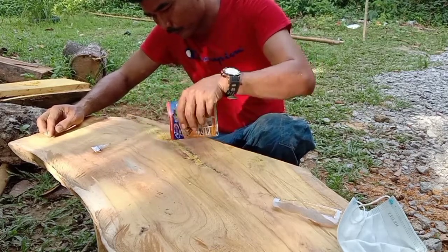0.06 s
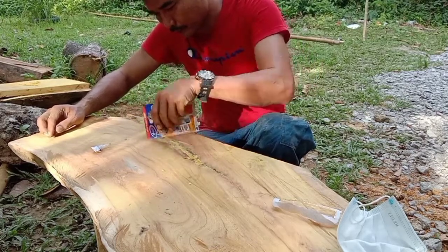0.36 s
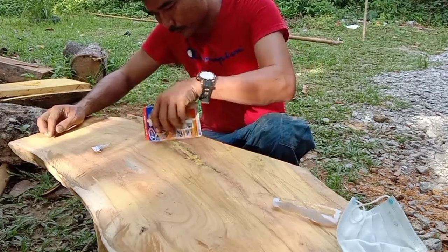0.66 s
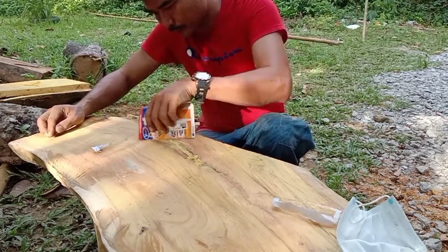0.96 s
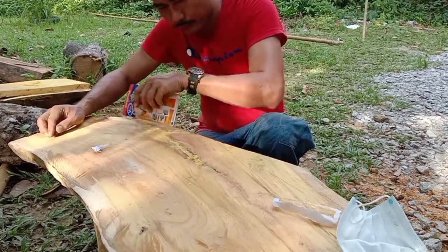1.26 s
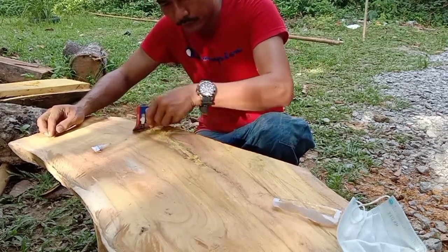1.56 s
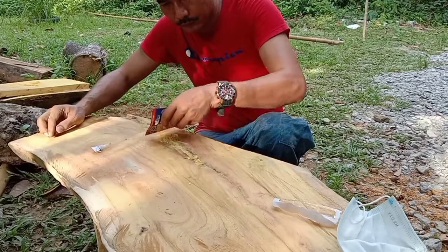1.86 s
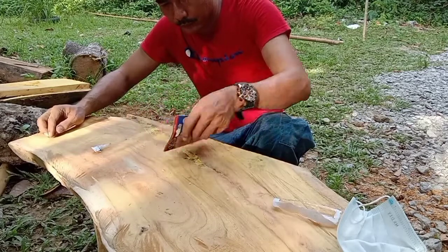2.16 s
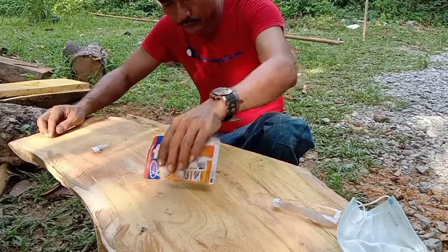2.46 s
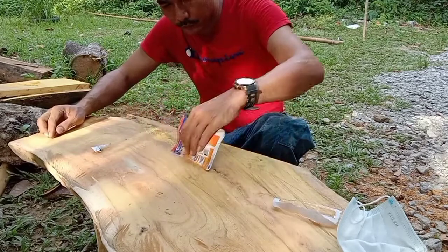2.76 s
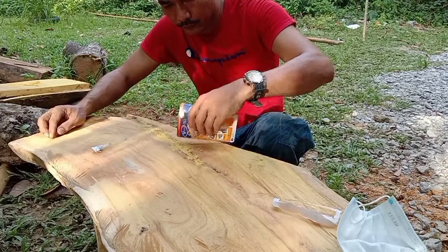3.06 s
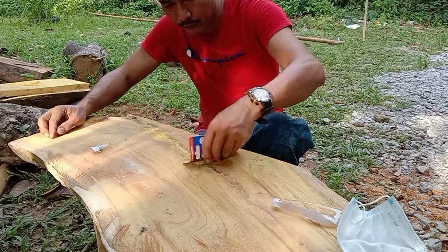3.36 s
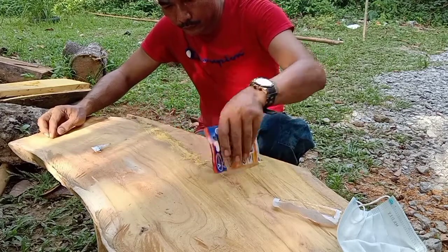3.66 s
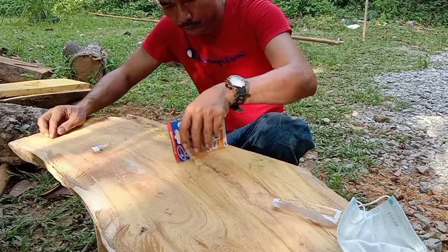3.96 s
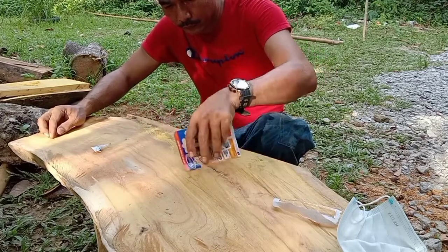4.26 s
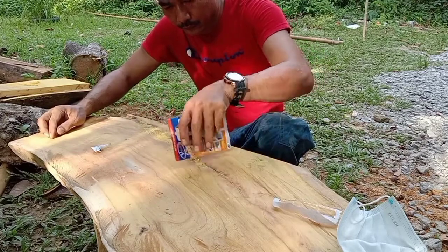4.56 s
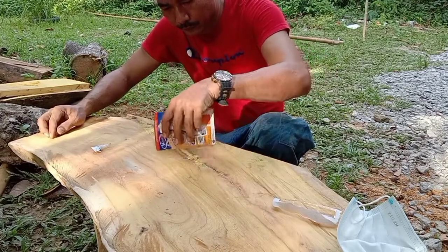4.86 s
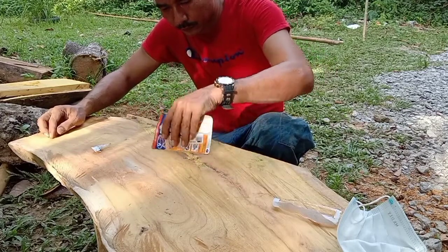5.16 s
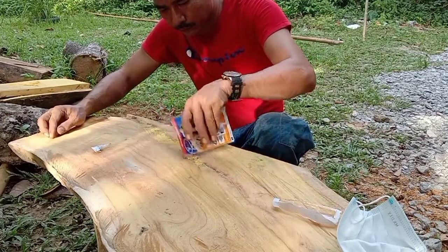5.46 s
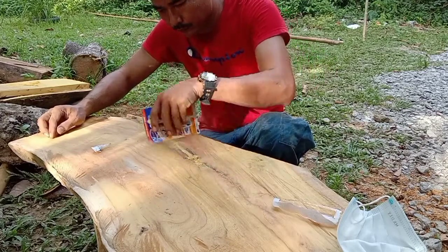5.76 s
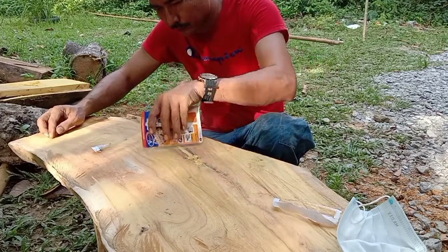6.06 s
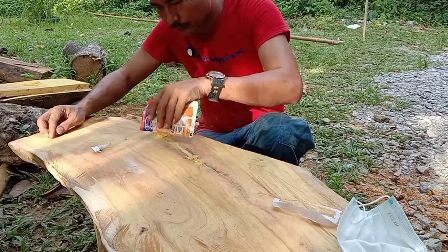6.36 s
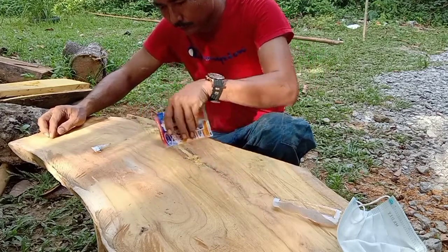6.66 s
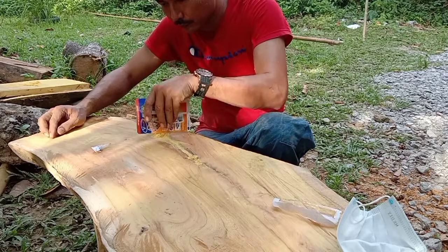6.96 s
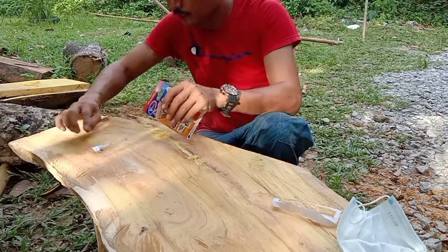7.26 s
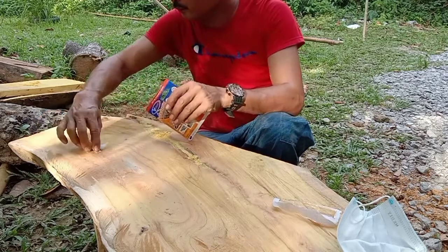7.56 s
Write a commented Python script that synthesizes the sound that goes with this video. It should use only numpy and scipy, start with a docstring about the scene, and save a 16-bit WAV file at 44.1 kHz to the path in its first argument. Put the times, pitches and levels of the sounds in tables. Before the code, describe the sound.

A stiff card scrapes a wooden slab in short strokes, light and then harder, while cicadas buzz faintly outdoors.

```python
"""Outdoors, cicadas buzz their tymbals, other insects twitter in quick falling notes, and a few
calls come from far away. A stiff card starts to scrape a wooden slab in short strokes, light at first,
then harder. Its edge catches and slips on the grain: the card rasps and bends, the edge hisses and
snaps off ridges, and under pressure the slab rumbles. Last, a finger gives the wood one brief rub."""
import sys
import numpy as np
from scipy import signal
from scipy.fft import rfft, irfft, next_fast_len
from scipy.io import wavfile
from scipy.ndimage import uniform_filter1d, map_coordinates

SR = 44100
rng = np.random.default_rng(int(sys.argv[2]) if len(sys.argv) > 2 else 0)


def unload_wav(signal):
    """Save mono or channel-first audio to the path in sys.argv[1] as 16-bit WAV at rate SR, clipped to [-1, 1]."""
    wavfile.write(
        sys.argv[1],
        SR,
        np.round(np.clip(np.atleast_2d(signal).T, -1, 1) * 32767).astype(np.int16),
    )


N = 344862


def amp(db):
    """Decibels to gain."""
    return 10 ** (np.asarray(db) / 20)


def unit(x):
    """Scale to rms 1."""
    return x / np.sqrt(np.mean(x ** 2) + 1e-20)


def wobble(rate, size):
    """A smooth random curve, rate knots a second."""
    knots = rng.standard_normal(int(size * rate / SR) + 4)
    return map_coordinates(knots, [np.arange(size) * rate / SR])


def add(track, start_s, x):
    """Mix x into the track at start_s."""
    i = max(round(start_s * SR), 0)
    track[i:i + len(x)] += x[:len(track) - i]


def gate_db(t, hold_s, attack_db_per_s, release_db_per_s):
    """0 dB from time 0 to hold_s, with a steady rise before and a steady fall after."""
    return attack_db_per_s * np.minimum(t, 0) - release_db_per_s * np.maximum(t - hold_s, 0)


def response(curve, size=4096):
    """Minimum-phase impulse response of an EQ curve; energy 1."""
    hz, db = np.transpose(curve)
    bins_hz = np.fft.rfftfreq(size, 1 / SR)
    gain = amp(np.interp(np.log(bins_hz + 1), np.log(hz), db))
    cepstrum = irfft(np.log(gain))
    cepstrum[1:size // 2] *= 2
    cepstrum[size // 2 + 1:] = 0
    impulse = irfft(np.exp(rfft(cepstrum)))[:size // 2]
    return impulse / np.linalg.norm(impulse)


def ringing(body, t60, ring_db):
    """Give an impulse response a tail of dense random modes; energy 1."""
    t = np.arange(int(t60 * SR) + 2) / SR
    tail = rng.standard_normal(len(t)) * amp(-60 * t / t60)
    tail *= amp(ring_db) / np.linalg.norm(tail)
    tail[0] = 1
    impulse = signal.fftconvolve(body, tail)
    return impulse / np.linalg.norm(impulse)


def noise(curve):
    """Steady noise coloured by an EQ curve; rms 1."""
    colour = response(curve)
    return unit(signal.fftconvolve(rng.standard_normal(N + len(colour) - 1), colour, "valid"))


def fuzzy_tone(hz, width_hz, size=N):
    """A narrow band of noise around a steady or gliding pitch; rms 1."""
    drift = wobble(width_hz, size) + 1j * wobble(width_hz, size)
    phase = 2 * np.pi * np.cumsum(hz + np.zeros(size)) / SR
    return unit(np.real(drift * np.exp(1j * phase)))


# Tone of the outdoor bed: freq_hz, gain_db
AIR_EQ = [(20, -21), (45, -11), (90, 1.5), (140, 2.5), (300, -6), (600, -8), (900, -6.5), (1450, -7.5),
          (2000, -16), (3300, -15), (6000, -19), (10000, -33.5)]

def air():
    """Still air and far rustle: a low bed that barely wavers."""
    return amp(-66.5 + 0.4 * wobble(3.1, N)) * noise(AIR_EQ)


# Faint calls in the distance: start_s, length_s, start_hz, end_hz, level_db, blur_hz
CALL_CUES = [(0, 0.044, 404, 418, -58, 11), (0.036, 0.063, 427, 440, -62.5, 9.6),
             (0, 0.17, 1706, 1570, -60.5, 500), (0.133, 0.13, 1490, 1240, -58, 230),
             (0.636, 0.09, 1540, 1690, -62, 260), (1.175, 0.11, 1240, 1296, -65.5, 100),
             (1.416, 0.067, 1263, 1187, -58, 52), (1.451, 0.12, 1590, 1660, -64.5, 100)]

def far_calls():
    """Short gliding calls, blurred by distance."""
    out = np.zeros(N)
    for start_s, length_s, start_hz, end_hz, level_db, blur_hz in CALL_CUES:
        size = int(length_s * SR)
        call = fuzzy_tone(np.linspace(start_hz, end_hz, size), blur_hz, size)
        add(out, start_s, amp(level_db) * call * signal.windows.tukey(size, .5))
    return out


# Tone of the cicada chorus: freq_hz, gain_db
CICADA_EQ = [(5600, -40.5), (6400, -14.5), (6900, -4), (7350, -3), (7650, -2), (8000, -3), (8400, -9),
             (9200, -27), (10300, -26), (11000, -19.5), (11500, -33), (12500, -21), (14000, -22),
             (15400, -17)]

def cicadas():
    """A chorus of buzzing tymbals, with two nearer voices standing out as pitched bands."""
    chorus = noise(CICADA_EQ) * amp(-62 + wobble(300, N))
    low_voice = amp(-71 + 3.7 * wobble(2.1, N)) * fuzzy_tone(7330, width_hz=250)
    high_voice = amp(-80 + 1.5 * wobble(3.2, N)) * fuzzy_tone(7980, width_hz=150)
    return (chorus + low_voice + high_voice) * amp(0.4 * wobble(1.9, N))


# Guide curves for the twitter: start_s, length_s, guide_db, first_guide_hz, last_guide_hz
TWITTER_PHRASES = [(0.352, 0.5, -60, 5180, 5500), (1.186, 1.07, -60, 6020, 5980),
                   (2.334, 0.093, -59.5, 5380, 5230), (3.5, 0.4, -57, 5430, 5430),
                   (4.22, 0.28, -60.5, 5540, 5160), (5.401, .2, -64, 5070, 5120),
                   (5.896, .25, -58, 5430, 5420), (6.418, .68, -54, 5790, 5460),
                   (7.25, 0.233, -71, 4880, 4830), (7.72, .1, -58.5, 5630, 5730)]

def phrasing(t, idle_db=-77.5, idle_hz=4750.0, fade_s=.1):
    """Guide level and pitch for the notes: each phrase lifts both above a soft, low idle."""
    effort, guide_db, guide_hz = np.zeros(len(t)), np.full(len(t), idle_db), np.full(len(t), idle_hz)
    for start_s, length_s, db, first_hz, last_hz in TWITTER_PHRASES:
        lift = np.clip(1 + np.minimum(t - start_s, start_s + length_s - t) / fade_s, 0, 1)
        hz = np.interp(t, [start_s, start_s + length_s], [first_hz, last_hz])
        guide_db = np.where(lift > effort, idle_db + lift * (db - idle_db), guide_db)
        guide_hz = np.where(lift > effort, idle_hz + lift * (hz - idle_hz), guide_hz)
        effort = np.maximum(effort, lift)
    return guide_db, guide_hz


def insect_twitter(notes_per_s=110, note_s=0.029, floor_hz=4520, fall_share=.75):
    """Quick falling notes and their echoes from the trees merge into a twitter over a thin whine."""
    out, t = np.zeros(N), np.arange(int(note_s * SR)) / SR
    last_s = N / SR - note_s
    times = np.arange(0, last_s, 1 / notes_per_s)
    envelope = np.sqrt(np.abs(np.sin(np.pi * t / note_s)))
    scatter = rng.standard_normal((len(times), 3))
    for start_s, guide_db, guide_hz, (late, loud, sharp) in zip(times, *phrasing(times), scatter):
        top_hz = guide_hz + 200 + 50 * sharp
        pitch_hz = top_hz - fall_share * (top_hz - floor_hz) * t / note_s
        note = np.sin(2 * np.pi * np.cumsum(pitch_hz) / SR) * envelope
        echoed = signal.fftconvolve(note, ringing(np.ones(1), t60=.1, ring_db=6))
        add(out, min(start_s + 0.0085 * late, last_s), amp(guide_db - 5 + 3 * loud) * echoed)
    whine_db = -70.5 + 2.2 * wobble(3, N)
    whine_hz = 4640 + 70 * wobble(3.3, N) + 90 * wobble(200, N)
    return out + amp(whine_db) * fuzzy_tone(whine_hz, width_hz=420)


def slips(size, per_s, spread_db):
    """Stick-slip crackle: tiny releases at random moments, a few much larger than the rest."""
    strength = amp(spread_db * np.minimum(rng.exponential(size=size), 3))
    fires = rng.random(size) < per_s / SR
    return unit(fires * strength * rng.choice([-1, 1], size))


def scuff(body, rise_s=.0018):
    """A soft contact: a tiny swell of friction rings the body; peak 1."""
    t = np.arange(SR // 50) / SR
    friction = rng.standard_normal(len(t)) * t * np.exp(-t / rise_s)
    contact = signal.fftconvolve(friction, body)
    return contact / np.abs(contact).max()


# The few high resonances that a light touch wakes: freq_hz, gain_db
TOUCH_EQ = [(600, -38), (1050, -43.5), (1270, 2.5), (1500, -13.5), (2300, -13), (3200, 0), (3600, -2),
            (3900, 2.5), (4250, -2), (4650, 3.5), (5300, -15), (7500, -8), (10500, -25.5), (14500, -14.5)]
# Light ticks on the wood: start_s, dry_peak_db
TICK_CUES = [(1.316, -43), (1.425, -37), (1.809, -35.5), (3.074, -44), (7.581, -26)]

def ticks():
    """Light contacts ring the wood, thin and bright."""
    out, touch = np.zeros(N), response(TOUCH_EQ)
    for start_s, peak_db in TICK_CUES:
        add(out, start_s, amp(peak_db) * scuff(ringing(touch, t60=0.17, ring_db=-1)))
    return out


def finger_rub(start_s=7.56, hold_s=0.094, lead_s=.07):
    """A fingertip slips over the grain and excites the same high resonances as the ticks."""
    out, t = np.zeros(N), np.arange(SR // 4) / SR - lead_s
    grain = unit(slips(len(t), per_s=3800, spread_db=5) + amp(-12) * rng.standard_normal(len(t)))
    level_db = -48 + gate_db(t, hold_s, attack_db_per_s=830, release_db_per_s=529)
    add(out, start_s - lead_s, signal.fftconvolve(grain * amp(level_db), response(TOUCH_EQ)))
    return out


# Narrow modes of the slab: pitch_hz
WOOD_MODES = [302, 1071, 1165, 1475, 1678, 1774, 2040, 2528, 2708, 3043, 3282, 3662, 3903, 4395, 5753]

def wood_ring(x, width_hz=21):
    """The slab rings on briefly at its modes and colours everything played on it."""
    rings = sum(signal.lfilter(*signal.iirpeak(hz, hz / width_hz, SR), x) for hz in WOOD_MODES)
    return amp(-1.3) * x + amp(-9) * rings


# Card rasp, edge hiss, fine sizzle, hollow card flex and slab rumble, each: freq_hz, gain_db
CARD_EQ = [(100, -69), (480, -54.5), (720, -26.5), (860, -6), (1050, -1.5), (1250, 0), (1520, 1),
           (1750, -6.5), (2100, -10), (3500, -48.5)]
EDGE_EQ = [(200, -60), (1200, -31.5), (1800, -2), (2200, 2), (2800, 1.5), (3600, -1.5), (4400, -12),
           (6500, -38.5), (10000, -54.5)]
SIZZLE_EQ = [(500, -53.5), (2500, -35.5), (3900, -5), (4600, -1), (5700, 0), (6500, -4), (7800, -7.5),
             (9300, -23), (11500, -25.5), (12600, -17), (15500, -16)]
FLEX_EQ = [(80, -61.5), (300, -33), (470, -29), (580, -3), (760, 2.5), (880, 5), (1150, -31), (3000, -58.5)]
SLAB_EQ = [(30, -42), (90, -29), (170, -20), (240, -16), (300, -2.5), (390, 2.5), (490, -4.5), (700, -32),
           (2000, -62)]

def bodies():
    """Impulse responses of the five resonators that the card's edge drives."""
    return [response(curve) for curve in (CARD_EQ, EDGE_EQ, SIZZLE_EQ, FLEX_EQ, SLAB_EQ)]


# The card touches down ahead of a stroke: start_s, dry_peak_db
LANDING_CUES = [(0.251, -43), (0.993, -50), (1.006, -35.5), (1.944, -44.5), (3.812, -28), (4.249, -44),
                (4.278, -32.5), (4.671, -38), (5.118, -49), (5.565, -38.5)]

def card_landings():
    """A soft landing rings only the card."""
    out, card = np.zeros(N), response(CARD_EQ)
    for start_s, peak_db in LANDING_CUES:
        add(out, start_s, amp(peak_db) * scuff(ringing(card, t60=0.077, ring_db=0)))
    return out


# The edge snaps free of a ridge; the row at 3.169 s is the card touching down hard ahead of a stroke: start_s,
# dry_peak_db, edge_trim_db, slab_trim_db
SNAP_CUES = [(0.284, -26, -7, -31), (0.289, -26.5, -13, -27), (0.391, -25, -16, -27), (0.821, -36, -4, -40),
             (1.091, -24, -5, -38), (1.116, -23, -11, -22), (2.046, -25, -14, -40),
             (2.652, -19, -13, -53.5), (2.743, -12.5, -10, -63.5), (2.811, -16.5, 3, -62),
             (3.169, -28.5, -12, -26), (3.325, -14.5, -7, -26.5), (3.347, -16.5, -14, -18.5),
             (3.406, -8, -11.5, -15), (3.889, -9, -7, -39.5), (3.98, -12, -11.5, -31.5),
             (4.315, -12.5, -10, -39.5), (4.345, -9, -14, -37.5), (4.409, -3.5, -16, -43.5),
             (4.725, -11.5, -13.5, -47), (4.781, -9.5, -7.5, -41), (4.855, -8.5, -21.5, -51),
             (4.861, -17, -16, -32), (5.156, -23.5, -6, -42), (5.183, -17.5, -12, -33),
             (5.236, -15.5, -15, -36), (5.613, -25, -18.5, -42.5), (5.669, -13, -13.5, -51),
             (5.727, -11.5, -20.5, -22), (6.281, -9.5, -1, -51), (6.284, -8.5, -7.5, -46),
             (6.297, -10.5, -4, -52), (6.31, -13.5, -3, -41), (6.647, -22.5, -35, -39),
             (6.677, -17, -20.5, -43), (6.792, -19, -24.5, -39)]

def edge_snaps(crumble_s=.012):
    """A hard catch lets go in one short burst through all five resonators."""
    out, t = np.zeros(N), np.arange(SR // 20) / SR
    card, edge, sizzle, flex, slab = bodies()
    bright = edge + amp(-14.5) * sizzle
    for start_s, peak_db, edge_trim_db, slab_trim_db in SNAP_CUES:
        body = card + amp(edge_trim_db + 9) * bright + amp(-14.5) * flex + amp(slab_trim_db + 12.5) * slab
        burst = rng.standard_normal(len(t)) * amp(-60 * t / crumble_s)
        burst[0] = 6  # one sharp click of release ahead of the crumbling
        snap = signal.fftconvolve(burst, ringing(body, t60=0.079, ring_db=-3))
        add(out, start_s, amp(peak_db) * snap / np.abs(snap).max())
    return out


def sticking_db(t, dip_db=2, stick_s=.012):
    """The lull in the drag while the edge hangs on a ridge ahead of each snap."""
    lulls = [np.exp(-((t - snap_s) / stick_s * 2 + 1) ** 2) for snap_s, *_ in SNAP_CUES]
    return -dip_db * np.max(lulls, axis=0)


def bent(drive, body, pitch_ratio):
    """Ring a body whose resonances slide by pitch_ratio at each sample."""
    clock = np.cumsum(pitch_ratio)
    stretched = drive[np.searchsorted(clock, np.arange(clock[-1]))]
    return map_coordinates(signal.fftconvolve(stretched, body), [clock])


def pressed(x, span_s=.028):
    """The hand holds its pressure, so the level stays even over spans longer than single slips."""
    power = np.abs(uniform_filter1d(x ** 2, int(span_s * SR)))
    return x / np.sqrt(power + 1e-9)


def pressure_db(progress, peak_share, swell_db, sag_db):
    """The hand leans in: a rounded swell to 0 dB at peak_share of the stroke, then a sag."""
    swell = swell_db * (1 - progress / peak_share) ** 2
    sag = sag_db * ((progress - peak_share) / (1 - peak_share)) ** 2
    return -np.where(progress < peak_share, swell, sag)


# Card strokes: start_s, length_s, peak_share, rasp_db, swell_db, sag_db, hiss_db, bow_db, steep_db,
# rumble_db, rumble_share, card_start_hz, card_end_hz, edge_hz
# Shares place the peaks along the stroke. Hiss and bow ride on the rasp; steep is sizzle over hiss.
STROKE_CUES = [ (0.257, 0.18, 0.2, -42, -1, 5.5, -1.5, -10.5, -1, -54, 0.27, 1238, 1260, 3010),
               (0.745, 0.076, 0.33, -46, 4, -1, -0.5, -19, -3.5, -72, 0.3, 1463, 1463, 2790),
               (1.019, 0.12, 0.55, -39, 5.5, 4.5, -3, -10.5, -3, -50.5, 0.62, 1480, 1285, 2800),
               (1.563, 0.2, 0.74, -37, 9, 7.5, -2, -13.5, -4.5, -46.5, 0.67, 1387, 1384, 2703),
               (1.981, 0.12, 0.59, -38.8, 9.5, 5, 1, -17, -4.5, -49, 0.82, 1680, 1277, 2594),
               (2.592, 0.26, .78, -25.5, 17, 3, -1.7, -20, 0, -59.5, 0.65, 1232, 1360, 2890),
               (3.197, 0.18, 0.76, -30, 11.5, 7, 0, -8.5, -4.5, -39.5, 0.62, 1598, 1467, 2520),
               (3.409, 0.062, 0.57, -33, -0.5, 2.5, 5, -3, -10.5, -37, 0.15, 1400, 1350, 2410),
               (3.827, 0.17, 0.49, -27, 12.5, -3, -0.8, -12, -5.5, -46.5, 0.68, 1398, 1223, 2744),
               (4.303, .13, 0.86, -23, 6, 6, -1, -12, -7.5, -38, 0.8, 1327, 1274, 2944),
               (4.717, 0.18, 0.44, -24.5, 7.5, 7.5, -3.5, -12.5, -6.5, -50, 0.43, 1345, 1328, 2770),
               (5.159, 0.13, 0.52, -28, 13, 12, -3, -5.5, -3.5, -49.5, 0.99, 1307, 1190, 2783),
               (5.586, 0.29, .38, -28, 13, 15, -5, -8, -3.5, -47, 0.36, 1196, 1108, 2890),
               (6.177, 0.16, 0.85, -33, 12, 7, -1, -16, -4.5, -49.5, 0.99, 1273, 1379, 2760),
               (6.639, 0.26, 0.94, -34, 6, 2, -3.5, -7.5, -4.5, -48, 0.74, 1162, 1128, 2782), ]

def card_scrapes(card_rest_hz=1301, edge_rest_hz=2750, flex_glide=0.17, span_s=.52, lead_s=.07):
    """Stick and slip on the wood grain drives card, edge and slab; the card's ring slides as it bends."""
    out, t = np.zeros(N), np.arange(int(span_s * SR)) / SR - lead_s
    size = len(t)
    card, edge, sizzle, flex, slab = bodies()
    for (start_s, length_s, peak_share, rasp_db, swell_db, sag_db, hiss_db, bow_db, steep_db,
         rumble_db, rumble_share, card_start_hz, card_end_hz, edge_hz) in STROKE_CUES:
        progress = np.clip(t / length_s, 0, 1)
        grip_db = gate_db(t, length_s, attack_db_per_s=850, release_db_per_s=482)
        grain_db = 1.37 * wobble(47.5, size)
        contact_db = grip_db + grain_db + sticking_db(start_s + t)
        card_db = rasp_db + contact_db + pressure_db(progress, peak_share, swell_db, sag_db)
        card_hz = card_start_hz + (card_end_hz - card_start_hz) * progress
        # the card starts straight: its flex comes in late and drops in pitch as more of it bows
        flex_db = card_db + bow_db - 4.5 * np.exp(-np.maximum(t, 0) / 0.026)
        flex_ratio = 1 + flex_glide * (.6 - progress)
        # the slab answers most at one point of the path
        from_rumble_s = (progress - rumble_share) * length_s
        slab_db = rumble_db + contact_db + gate_db(from_rumble_s, 0, 258.5, 148)
        # a steep edge gives more of its hiss to the fine sizzle
        edge_db = card_db + hiss_db - 10 * np.log10(1 + amp(steep_db) ** 2)
        # the edge chatters over ridges, so the slips come in clumps
        chatter = amp(1.2 * wobble(120, size) + 2.3 * wobble(450, size))
        catches = slips(size, per_s=3200, spread_db=4)
        force = chatter * (catches + amp(-4.5) * rng.standard_normal(size))
        fine_force = chatter * (catches + amp(2) * rng.standard_normal(size))
        for drive, level_db, body, pitch_ratio in [
            (force, card_db + .26, ringing(card, t60=0.12, ring_db=-6), card_hz / card_rest_hz),
            (fine_force, edge_db + .34, ringing(edge, t60=0.077, ring_db=-2),
             edge_hz / edge_rest_hz * amp(.25 * wobble(14, size))),
            (fine_force, edge_db + steep_db + .4, ringing(sizzle, t60=0.027, ring_db=-4.5),
             1 + 0.018 * wobble(11, size)),
            (force, flex_db + .13, ringing(flex, t60=0.05, ring_db=-2), flex_ratio),
            (force, slab_db + .8, ringing(slab, t60=0.12, ring_db=-6.5), np.ones(size)),
        ]:
            add(out, start_s - lead_s, amp(level_db) * pressed(bent(drive, body, pitch_ratio)))
    return out


def scene():
    """Card and finger up close with a faint reflection from the yard; air, insects and calls behind."""
    foley = wood_ring(card_scrapes() + edge_snaps() + card_landings() + ticks() + finger_rub())
    yard = ringing(np.ones(1), t60=0.12, ring_db=-24)
    background = air() + cicadas() + insect_twitter() + far_calls()
    return (signal.fftconvolve(foley, yard)[:N] + background)[None]


def record(dry):
    """A brick-wall low-pass trims the very top of the mix."""
    size, cutoff_hz = next_fast_len(N + SR // 2), 15650
    passband = np.fft.rfftfreq(size, 1 / SR) < cutoff_hz
    return irfft(rfft(dry, size) * passband, size)[:, :N]


dry = scene()
out = record(dry)
unload_wav(out)
```